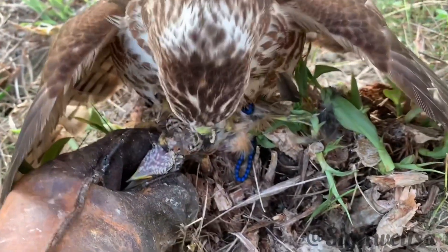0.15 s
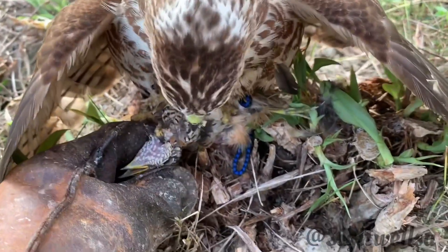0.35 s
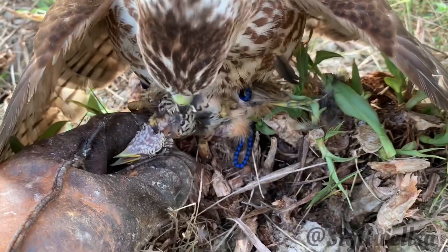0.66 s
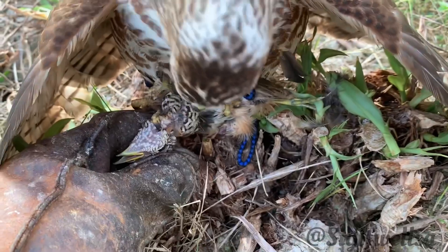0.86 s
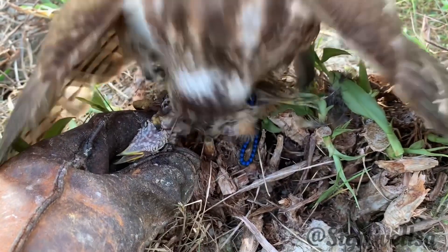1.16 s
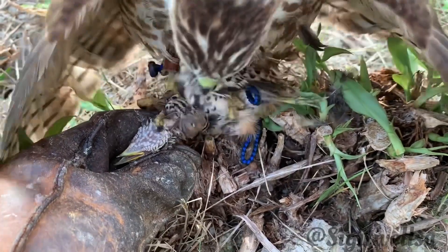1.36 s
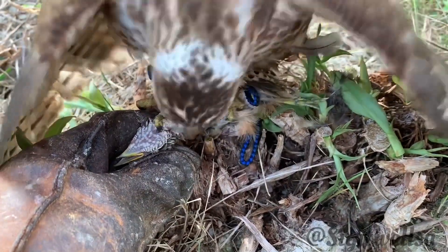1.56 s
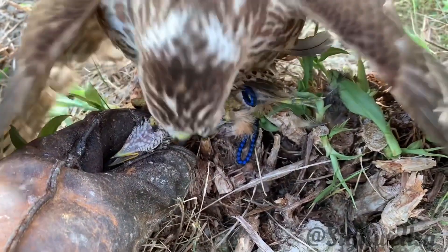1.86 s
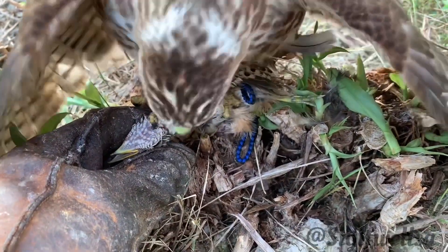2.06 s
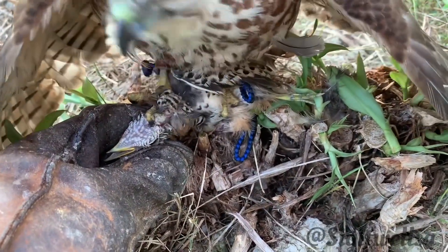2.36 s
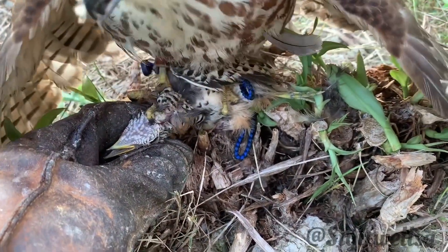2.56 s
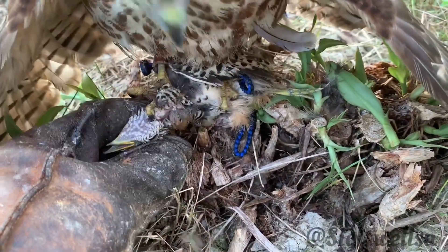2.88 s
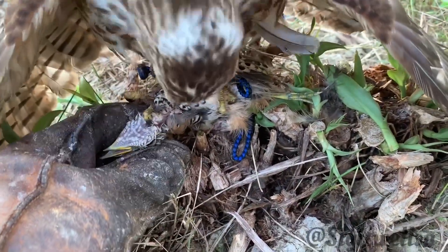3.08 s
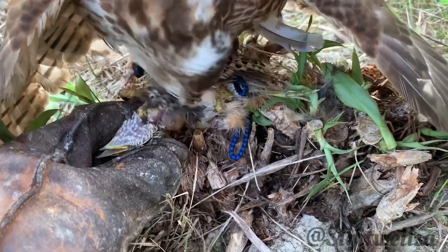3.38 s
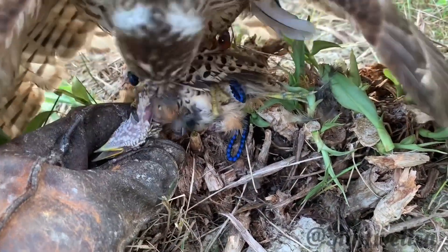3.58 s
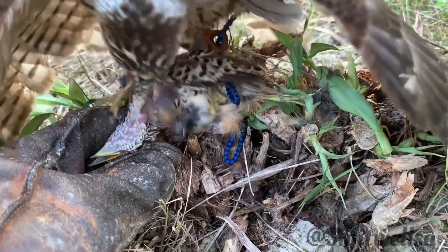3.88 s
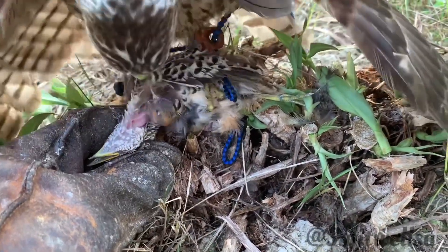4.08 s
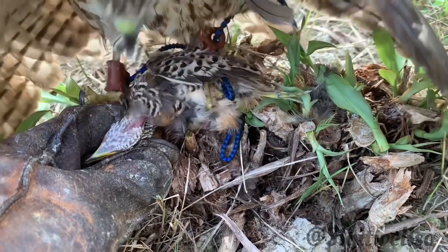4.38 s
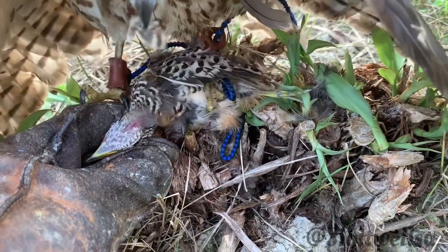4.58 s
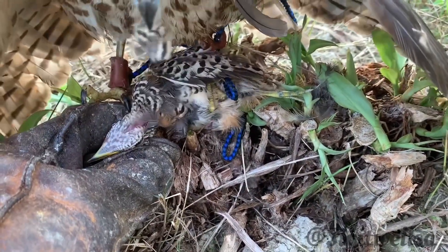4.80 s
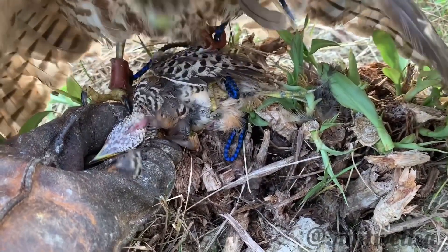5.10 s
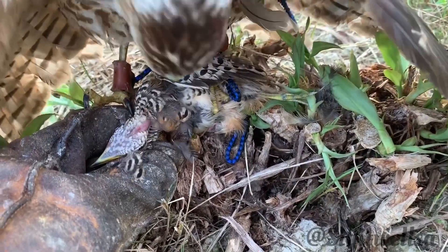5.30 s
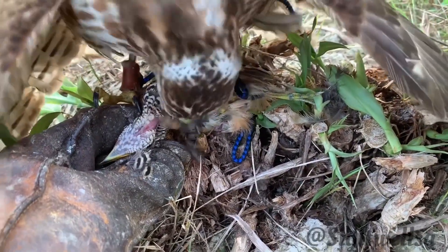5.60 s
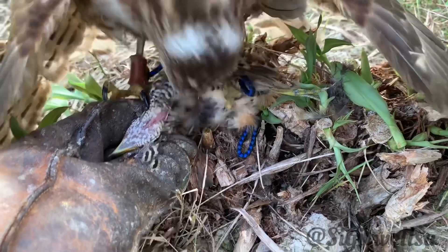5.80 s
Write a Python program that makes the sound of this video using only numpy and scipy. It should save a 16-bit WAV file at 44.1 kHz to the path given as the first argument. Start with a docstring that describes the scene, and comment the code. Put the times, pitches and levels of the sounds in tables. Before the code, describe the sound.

A steady low rumble and a thin hiss fill a meadow near trees. Right under the microphone a small hawk feeds on the ground. For the first two seconds feathers rub and rustle softly and dry litter crackles, with a sharper snap and a soft knock of the prey at about 0.6 seconds. From 1 to 3.6 seconds the beak makes small hollow clicks, clearest around 3 seconds. A distant songbird whistles a few very faint notes between 2 and 2.8 seconds. Two quick clusters of dry snaps come at about 4 and 4.2 seconds, while a barely audible high insect pulses from 3.6 seconds on. At 5 seconds the hawk gives one sharp cry, a quarter of a second long and far louder than everything else. It leaps up, sinks and breaks off roughly, echoing faintly from the trees. Two tiny snaps follow near 5.7 seconds.

```python
"""A meadow by trees: a low rumble, thin hiss, a distant whistling songbird and an insect pulsing its wings.
A small hawk feeds on the ground right under the microphone: its beak clicks, feathers rub and rustle,
dry litter snaps and tugs knock the prey on the ground. Then its syrinx gives one sharp cry
that leaps up, sinks and breaks off roughly, with a faint echo from the trees."""
import sys
import numpy as np
from scipy import signal
from scipy.fft import rfft, irfft, next_fast_len
from scipy.io import wavfile

SR = 44100
rng = np.random.default_rng(int(sys.argv[2]) if len(sys.argv) > 2 else 0)


def pcm_store(signal):
    """Save signal as 16-bit PCM."""
    levels = np.round(np.clip(np.atleast_2d(signal), -1, 1) * 32767)
    wavfile.write(sys.argv[1], SR, levels.astype(np.int16).T)


N = 262262
T = np.arange(N) / SR

# Feather rubs. Each row: middle in seconds, length in seconds, level in dB, tilt in dB per octave.
FEATHER_RUBS = [(0.045, 0.07, -75, 1.5), (0.147, 0.15, -71, -3.5), (0.284, 0.18, -68, -3.5),
                (0.475, 0.39, -75, -5), (0.587, 0.08, -66.5, 2), (0.857, 0.084, -75.5, -4.5),
                (1.033, 0.14, -78, 5.5), (1.225, 0.18, -73, 0.5), (1.338, 0.061, -81.5, 2),
                (1.594, 0.067, -75, 11), (1.787, 0.06, -77.5, 0.5), (2.344, 0.1, -83, -2),
                (3.474, 0.062, -76.5, -3.5), (3.94, 0.21, -71, 0.5), (4.254, 0.12, -70, -2.5)]
# The tone of dry litter and feathers. Each row: frequency in Hz, gain in dB.
LITTER_EQ = [(200, -4), (700, 1.5), (1300, -6), (2750, 1), (3750, -6), (6300, -6), (8500, -8),
             (10500, -4.5), (13000, -5.5), (15500, -8)]


def undb(db):
    """Decibels to gain."""
    return 10 ** (np.asarray(db) / 20)


def unit(x):
    """Scale to rms 1."""
    return x / np.sqrt(np.mean(x ** 2) + 1e-30)


def curves(rows, at=T):
    """One curve for each column after the first, in straight lines between the rows."""
    knots, *columns = np.transpose(rows)
    return [np.interp(at, knots, column) for column in columns]


def colour(x, points):
    """Equalise through (Hz, dB) points."""
    hz, db = np.transpose(points)
    size = next_fast_len(len(x))
    bins_hz = np.fft.rfftfreq(size, 1 / SR)
    gain = undb(np.interp(np.log(bins_hz + 1), np.log(hz), db))
    return irfft(rfft(x, size) * gain, size)[:len(x)]


def band(x, lo_hz, hi_hz, order=2):
    """Causal band-pass."""
    sos = signal.butter(order, [lo_hz, min(hi_hz, .49 * SR)], "band", fs=SR, output="sos")
    return signal.sosfilt(sos, x)


def noise(count, lo_hz, hi_hz, order=2):
    """A band of noise, rms 1."""
    return unit(band(rng.standard_normal(count), lo_hz, hi_hz, order))


def add(out, start_s, x):
    """Mix a short sound in."""
    i = max(int(start_s * SR), 0)
    out[i:i + len(x)] += x[:max(N - i, 0)]


def meadow(rumble_db=-61.5):
    """A distant rumble and a low drone that dips, then slowly swells, under thin hiss."""
    # The tone of the rumble and of the hiss. Each row: frequency in Hz, gain in dB.
    rumble_eq = [(22, -42), (32, -29.5), (45, -8), (70, 0), (130, -0.5), (160, -2.5), (195, -13.5),
                 (260, -15), (350, -26), (500, -35.5), (800, -58), (2000, -78)]
    hiss_eq = [(400, -2), (1000, -2), (2000, .5), (4000, -2), (6000, -4.5), (7700, -2.5), (9500, 1.5),
               (11500, 3.5), (13000, -9), (16000, -9.5)]
    # Fader moves for the drone and the hiss. Each row: time in seconds, level in dB.
    drone_fader = [(0, -81.5), (1.8, -88), (3.4, -83), (4.6, -80), (5.95, -78.5)]
    hiss_fader = [(0, -89.5), (1.6, -90.5), (5.95, -91.5)]
    rumble = unit(colour(rng.standard_normal(N), rumble_eq)) * undb(rumble_db)
    drone = noise(N, 220, 300) * undb(curves(drone_fader)[0])
    hiss = unit(colour(rng.standard_normal(N), hiss_eq)) * undb(curves(hiss_fader)[0])
    return rumble + drone + hiss


def tree_echo(x, near_db=-58, far_db=-63, delay_s=0.085, t60_s=0.3):
    """Scattered returns from the undergrowth, then a weak echo from the trees."""
    t = T[:SR // 2]
    response = np.zeros(N)
    for start_s, db in ((0, near_db), (delay_s, far_db)):
        scatter = noise(len(t), 1200, 7500) * undb(-60 * t / t60_s)
        add(response, start_s, undb(db) * scatter / np.linalg.norm(scatter))
    return signal.fftconvolve(x, response[:SR])[:N]


def insect(stroke_hz=134, chirp_period_s=.1095, start_s=3.58, end_s=5.98, fade_s=0.23):
    """Wing strokes ring a narrow treble resonance in quick chirps; the bout swells and stops."""
    chirps = np.clip(.4 + np.cos(2 * np.pi * (T - 4.52) / chirp_period_s), 0, 1)
    strokes = 1 + .8 * np.cos(2 * np.pi * stroke_hz * T)
    bout = np.clip(np.minimum(T - start_s, end_s - T) / fade_s, 0, 1)
    swell = undb(-89.5 + 2.5 * (T - start_s))
    return noise(N, 9900, 10230) * chirps * strokes * bout * swell


def songbird(gain_db=-1.5, droop=.24, droop_s=0.0079):
    """Thin whistles from far off, each swinging up to a peak and down again."""
    # The song. Each row: middle in seconds, length in seconds, top pitch in Hz, level in dB.
    notes = [(2.034, .06, 2430, -94), (2.153, 0.043, 2500, -85), (2.222, .11, 3650, -91),
             (2.304, 0.05, 2510, -84), (2.637, 0.12, 3650, -85), (2.719, .08, 3970, -80.5)]
    out = np.zeros(N)
    for middle_s, length_s, top_hz, db in notes:
        t = np.arange(-length_s / 2, length_s / 2, 1 / SR)
        hz = top_hz * (1 - droop * (1 - np.exp(-np.abs(t) / droop_s)))
        whistle = np.sin(2 * np.pi * np.cumsum(hz) / SR) * signal.windows.tukey(len(t), .5)
        add(out, middle_s + t[0], undb(db + gain_db) * whistle)
    return out + tree_echo(out, near_db=-7.5, far_db=-14, delay_s=0.041, t60_s=0.26)


def feather_rustles(grains_per_s=3000, spread_db=4.5):
    """Feather barbs slip over each other in swells of tiny uneven clicks."""
    out = np.zeros(N)
    for middle_s, length_s, db, tilt_db in FEATHER_RUBS:
        n = int(length_s * SR)
        slips = rng.random(SR)[:n] < grains_per_s / SR
        strength = undb(spread_db * np.minimum(rng.exponential(size=SR)[:n], 5))
        polarity = np.sign(rng.standard_normal(SR)[:n])
        tilted_eq = [(hz, eq_db + tilt_db * np.log2(hz / 1000)) for hz, eq_db in LITTER_EQ]
        rustle = unit(colour(slips * strength * polarity, tilted_eq))
        add(out, middle_s - length_s / 2, undb(db) * rustle * signal.windows.hann(n))
    return out


def litter_crackle(cracks_per_rub=4, gain_db=10, spread_db=3, decay_s=0.00099):
    """Each rustle sets off a few small cracks in the litter."""
    out, t = np.zeros(N), T[:SR // 100]
    for middle_s, length_s, db, _ in FEATHER_RUBS:
        for offset, size in rng.uniform(-0.7, 1, (cracks_per_rub, 2)):
            crack = noise(len(t), 1200, .49 * SR) * np.exp(-t / decay_s)
            add(out, middle_s + offset * length_s / 2, undb(db + gain_db + spread_db * size) * crack)
    return colour(out, LITTER_EQ)


def prey_thumps(decay_s=0.0014, rise_s=0.00027):
    """A tug lets go and the prey's soft body knocks on the ground."""
    # Tugs that jolt the prey. Each row: start in seconds, level in dB, pitch in Hz.
    tugs = [(.5915, -38.5, 366), (3.999, -49.5, 630)]
    out, t = np.zeros(N), T[:SR // 16]
    envelope = 2 * (np.exp(-t / decay_s) - np.exp(-t / rise_s))
    for start_s, db, hz in tugs:
        add(out, start_s, undb(db) * np.sin(2 * np.pi * hz * t) * envelope)
    return out


def dry_snaps(gain_db=-3, body_lift_db=2, crack_s=.0011, tail_s=0.013, tail_db=-21):
    """A dry fibre breaks with a crack and shakes its neighbours."""
    # Breaking litter and quills. Each row: start in seconds, level in dB, low-mid body trim in dB.
    breaks = [(0.109, -53, -2), (0.2814, -50, -3), (0.5839, -44, -10), (0.5882, -37, -6),
              (0.9522, -60, 2.5), (1.019, -58, -27), (1.0608, -63, -3), (3.433, -55.5, -5),
              (3.937, -44.5, -14), (3.9499, -40, -7.5), (3.9649, -37, -10), (3.9958, -41.5, -2.5),
              (4.2182, -41, -16), (4.2411, -36.5, -4.5), (4.2507, -35, -4.5), (4.9545, -71.5, 8.5),
              (5.7017, -61, -5), (5.7745, -54, -6)]
    out, t = np.zeros(N), T[:SR // 16]
    envelope = np.exp(-t / crack_s) + undb(tail_db) * np.exp(-t / tail_s)
    for start_s, db, body_db in breaks:
        crack = noise(len(t), 2750, 15800)
        body = undb(body_db + body_lift_db) * noise(len(t), 480, 2100)
        add(out, start_s, undb(db + gain_db) * (crack + body) * envelope)
    return colour(out, LITTER_EQ)


def beak_clicks(tick_s=0.0019, tail_db=-25, tail_s=0.021):
    """Each closing of the beak is a tiny tick and a short hollow knock, followed by a faint crackle."""
    # The beak's resonances. Each row: frequency in Hz, bandwidth in Hz, level in dB.
    modes = [(728, 185, -4.5), (1740, 530, -15.5), (2470, 510, -14.5)]
    # Closings of the beak. Each row: start in seconds, level in dB, tick trim in dB.
    bites = [(0.989, -59.5, -4.5), (1.379, -52, -13), (1.91, -71.5, 10), (2.139, -61.5, -6.5),
             (2.307, -67, -3), (2.379, -72, -13), (2.532, -52, -19), (2.652, -56.5, -4.5),
             (2.778, -43.5, -11), (2.836, -49.5, -13), (2.944, -49.5, -17.5), (3.073, -49.5, -9),
             (3.117, -55.5, -14), (3.186, -52, -40), (3.258, -56.5, -26), (3.42, -59.5, -22),
             (3.566, -67, 4.5)]
    out, t = np.zeros(N), T[:SR // 16]
    knock = sum(undb(db) * np.exp(-np.pi * width_hz * t) * np.sin(2 * np.pi * hz * t)
                for hz, width_hz, db in modes)
    for start_s, db, tick_db in bites:
        tick = noise(len(t), 900, 6900) * np.exp(-t / tick_s) / 2
        grains = rng.standard_normal(len(t)) ** 3  # cubing makes the noise spiky
        tail = unit(band(grains, 1000, 3500)) * np.exp(-t / tail_s) / 2
        add(out, start_s, undb(db) * (knock + undb(tick_db) * tick + undb(tail_db) * tail))
    return out


def throat_gain(k, pitch_hz, slack):
    """Strength of partial k: shaped by the throat, duller at low effort, less steady the higher it is."""
    # Resonances of the throat and open beak. Each row: frequency in Hz, gain in dB.
    throat_eq = [(1300, -3.5), (2020, -15.5), (2230, -16.5), (2450, -19.5), (3000, -1), (4250, 4),
                 (4520, -1.5), (4680, -10.5), (4900, -6), (6400, -8.5), (7400, -6), (7800, -11), (8800, -6),
                 (9800, -12), (11200, -10.5), (12300, -29.5), (13300, -34), (14700, -23), (16000, -30)]
    dull_db = -3.5 * (k - 1.5) * slack
    flutter_db = 0.0923 * k ** 2 * noise(len(pitch_hz), 30, 200, order=4)
    return undb(curves(throat_eq, k * pitch_hz)[0] + dull_db + flutter_db)


def hawk_cry(gain_db=-21, attack_s=.014, release_s=0.052, accent_at_s=5.013, jitter=0.15, shimmer=0.28):
    """The syrinx sings a harmonic stack; its cycles turn uneven where the pressure rises and fails."""
    # The cry's pitch line. Each row: time in seconds, pitch in Hz.
    glide = [(4.987, 1370), (4.998, 2259), (5.014, 2450), (5.033, 2463), (5.074, 2279), (5.113, 2229),
             (5.142, 2134), (5.177, 2037), (5.224, 1321)]
    # One accent brightens the voice. Each entry: lift in dB, for harmonics 1 to 7.
    accent_lifts = [11, 7.5, 16.5, 17.5, 14, 1, -0.5]
    t = np.arange(glide[0][0], glide[-1][0], 1 / SR)
    n = len(t)
    hz, = curves(glide, t)
    effort = np.minimum((t - t[0]) / attack_s, (t[-1] - t) / release_s)
    slack = np.clip(1 - effort, 0, 1) ** 2  # 1 at both ends, 0 in the hold
    accent_width_s = np.where(t < accent_at_s, 0.015, 0.045)
    accent = np.exp(-((t - accent_at_s) / accent_width_s) ** 2)
    roughness = 0.02 + .7 * np.sqrt(slack)
    phase = 2 * np.pi * np.cumsum(hz) / SR + jitter * roughness * noise(n, 60, 500, order=4)
    voice = sum(throat_gain(k, hz, slack) * undb(lift_db * accent) * np.sin(k * phase)
                for k, lift_db in enumerate(accent_lifts, 1))
    voice *= 1 + shimmer * roughness * noise(n, 60, 600, order=4)
    # Alternate cycles differ a little, which puts faint smeared tones between the harmonics.
    # Each row: multiple of the pitch, level in dB.
    half_harmonics = [(.5, -53), (1.5, -42.5), (3.5, -32), (4.5, -32)]
    rasp = sum(undb(db) * throat_gain(k, hz, slack) * np.sin(k * phase) * noise(n, 7, 160, order=4)
               for k, db in half_harmonics)
    rasp *= undb(3 * noise(n, 8, 30) - 25 * slack)  # patchy, and fading at both ends
    hiss = noise(n, 5500, 12000, order=4) * slack * undb(-14)
    envelope = undb(gain_db - 43 * slack) * signal.windows.tukey(n, .03)
    out = np.zeros(N)
    add(out, t[0], (voice + rasp + hiss) * envelope)
    return band(out, 1220, 20000, order=4)


def stereo_image(x):
    """Both sides carry the same sound; the left leads in phase by an amount that grows with frequency."""
    # The stereo image. Each row: frequency in Hz, left phase lead in radians, left minus right in dB.
    image = [(63, 0.022, 0.6), (314, 0.84, -0.5), (700, 0.77, 3), (1500, .1, -8), (2010, 1.2, -1),
             (2395, 1.3, -2.5), (3370, 1.8, 1.5), (4313, 2.01, 0.5), (4970, 3.75, 1), (6970, 6.3, -0.5),
             (9107, 9.62, 0.5), (11260, 13.15, 0), (15350, 18.9, -1)]
    size = next_fast_len(N + SR // 10)
    lead, balance_db = curves(image, np.fft.rfftfreq(size, 1 / SR))
    left = undb(balance_db / 2) * np.exp(1j * lead / 2)
    return irfft(rfft(x, size) * np.array([left, 1 / left]), size)[:, :N]


def scene():
    """The hawk and its surroundings; a little of the rumble comes from the sides."""
    cry = hawk_cry()
    echo = tree_echo(cry)
    feeding = beak_clicks() + dry_snaps() + prey_thumps() + feather_rustles() + litter_crackle()
    background = songbird() + insect() + meadow()
    side = noise(N, 110, 300) * undb(-86)
    return stereo_image(background + feeding + cry + echo) + np.array([side, -side])


def record(dry, top_hz=15900):
    """The recorder's steep low-pass cuts the highest treble."""
    return signal.sosfilt(signal.ellip(10, .1, 80, top_hz, fs=SR, output="sos"), dry)


dry = scene()
out = record(dry)
pcm_store(out)
```